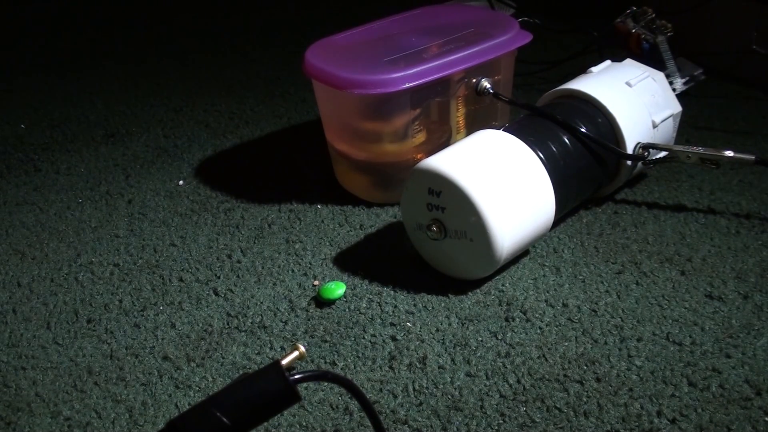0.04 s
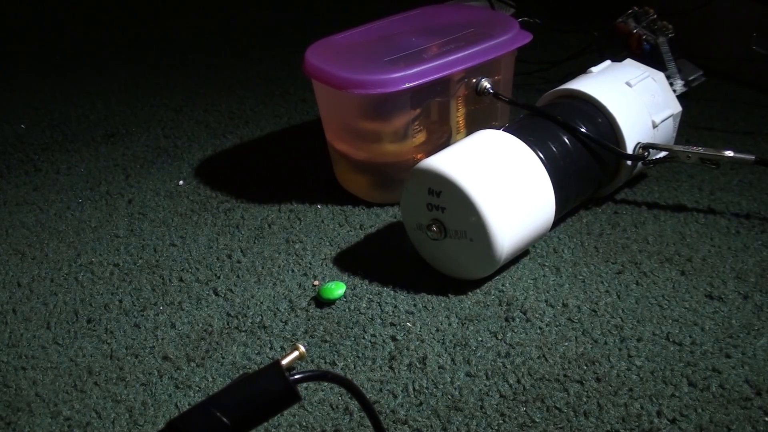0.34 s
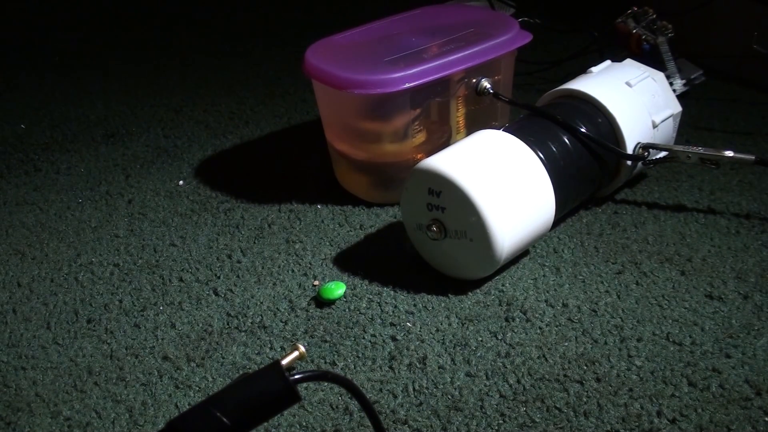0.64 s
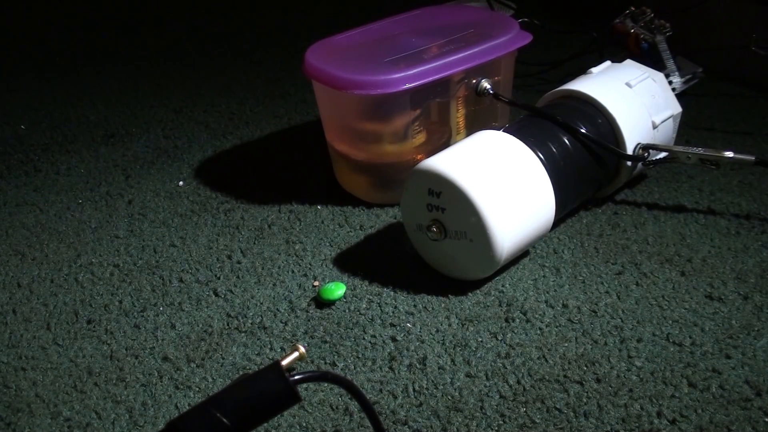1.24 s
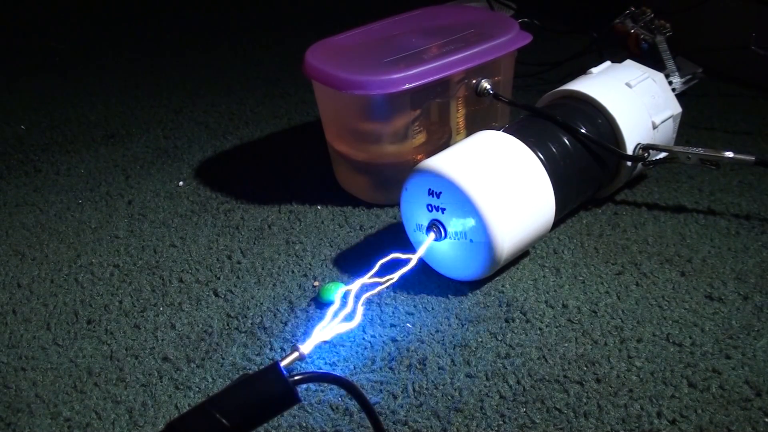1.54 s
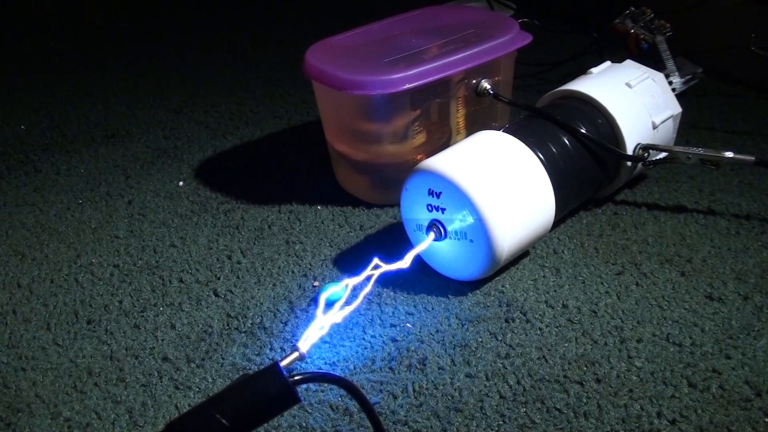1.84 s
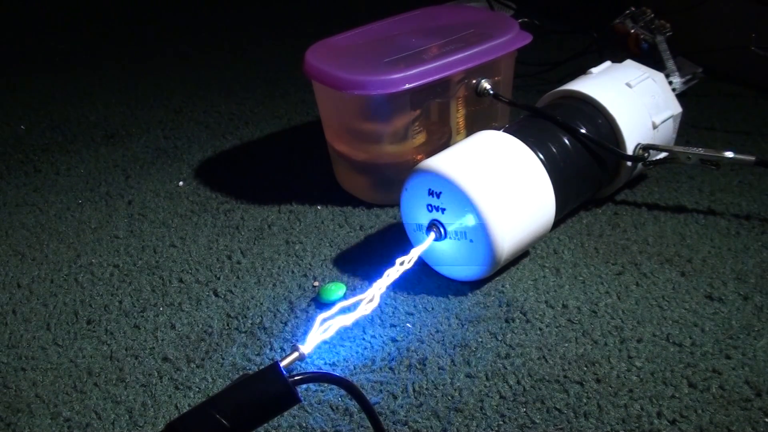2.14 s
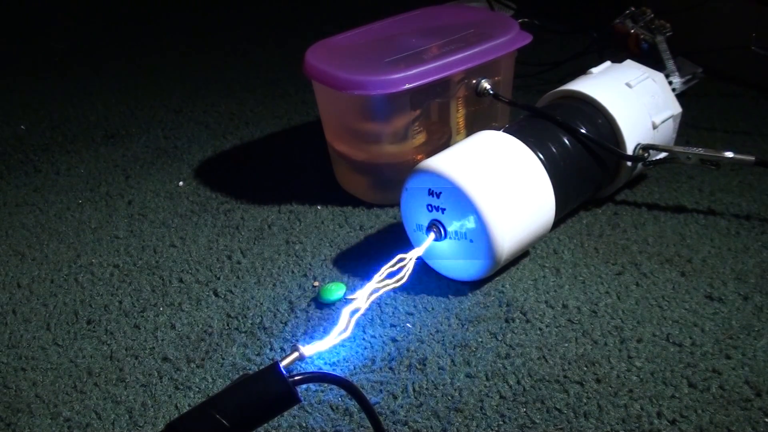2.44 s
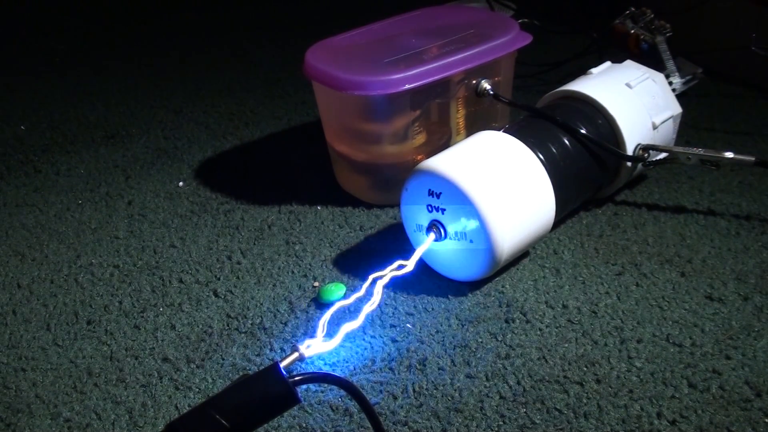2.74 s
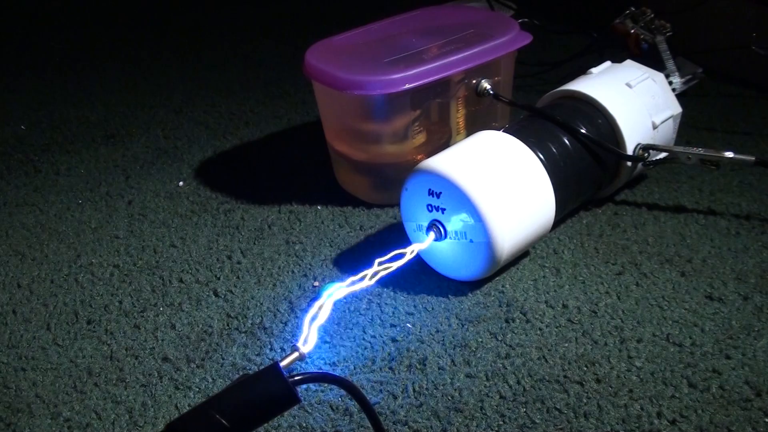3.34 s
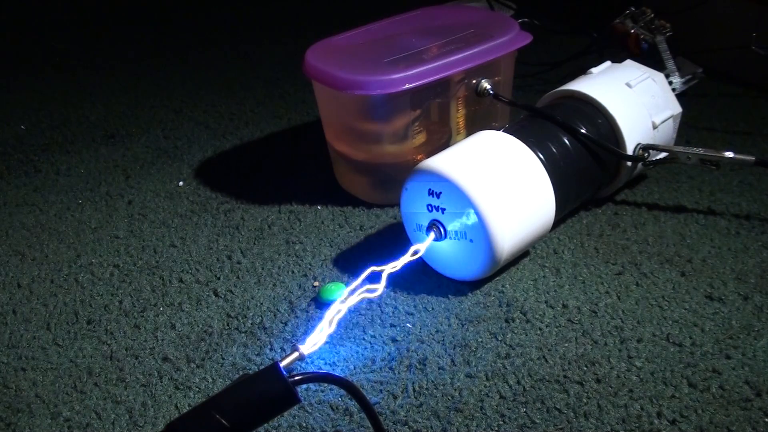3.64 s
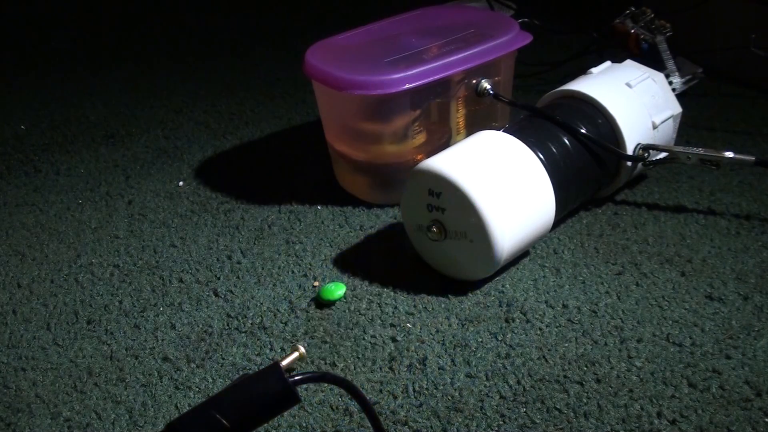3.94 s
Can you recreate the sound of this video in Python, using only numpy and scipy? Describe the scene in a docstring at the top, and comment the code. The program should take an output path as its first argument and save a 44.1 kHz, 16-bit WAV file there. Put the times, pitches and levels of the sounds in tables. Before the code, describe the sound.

A high-voltage electric arc strikes after a quiet moment, crackling and buzzing loudly.

```python
"""A small room, a stereo microphone near a high-voltage coil lying on the carpet. At first there is only
quiet air, a low hum and one tiny tick. At 1.36 s, with another tick and dull pops, an arc strikes to a
nearby probe: about 200 sparks a second at an uneven pace, each a bright snap at the electrode plus a
crack from its crooked channel. Nearby objects and the walls answer, the gain control turns down, and a
few more pops fall among the sparks. The arc stops at 3.94 s."""
import sys
import numpy as np
from scipy import signal
from scipy.fft import rfft, irfft, next_fast_len
from scipy.io import wavfile
from scipy.ndimage import uniform_filter1d, minimum_filter1d, map_coordinates

SR = 44100
rng = np.random.default_rng(int(sys.argv[2]) if len(sys.argv) > 2 else 0)


def wrap_up_sound(samples):
    """Save the sound to the file named by the first command line argument, as 16-bit audio."""
    columns = np.atleast_2d(samples).T
    # keep every value between -1 and 1, then stretch to whole-number steps
    tamed = np.clip(columns, -1, 1)
    steps = np.round(tamed * 32767).astype(np.int16)
    wavfile.write(sys.argv[1], SR, steps)


N = 176400

ARC_ON_S, ARC_OFF_S, ARC_GAIN_DB = 1.3619, 3.9365, 12.5
FULL_GAP_S, FULL_JITTER_S = .00535, .00032  # wait for a full recharge, at 0 dB drive
EARLY_GAP_S, EARLY_JITTER_S = .0041, .00042  # wait when the air breaks down early
EARLY_AFTER_FULL, EARLY_AFTER_EARLY = .36, .17  # chances of an early spark
GAP_S_PER_DB = .00009  # a stronger spark needs a longer recharge
SNAP_DB, SNAP_SCATTER_DB = -2, 0.5
FORK_DB, FORK_SPREAD_S = -8, 0.000301  # side branches at the electrode
CRACK_DB, CRACK_FACING_DB, CRACK_WANDER_DB, CRACK_DB_PER_DRIVE_DB = -11, 5, 0.37, 1.37
KINK_DB, CHANNEL_SPREAD_S = -17, 0.0002612  # bends along the channel arrive at scattered times
ALL_ROUND_DB = -12  # the crack as the room gets it, whichever way the channel faces
HARD_LIFT_DB, POP_LIFT_DB = 13, 9.5
PATH_CHANGES_PER_S, ROOM_RISE_S = 70, 0.0034
AIR_DB, HUM_WAVER_DB = -60, 1.5
THRESHOLD_DB, DEEPEST_CUT_DB, HOLD_S, TOP_HZ = -40, 14, .2, 16550  # the recorder

# strength of the arc: time_s, level_db
ARC_DRIVE = [(1.36, 3), (1.41, -1), (1.46, -1.5), (1.7, -1.9), (2.1, -0.64), (2.55, -0.57), (3.0, 0.8),
             (3.5, 1), (3.93, 1.2)]
# colour of the snap at the electrode: frequency_hz, gain_db
SNAP_COLOUR = [(60, -60), (200, -35.5), (700, -27.5), (2000, -20), (5000, -11.5), (8000, -5.5),
               (10500, -4.5), (11600, 0.7), (12500, 0.9), (13700, -1.5), (15000, -4), (16500, -9.5)]
# colour of the crack from the channel: frequency_hz, gain_db
CRACK_COLOUR = [(40, -20), (120, -9.5), (220, -9.5), (450, -4), (700, -4.5), (1300, -1), (2000, 0.5),
                (3000, 2.04), (4500, 0.96), (6500, 0), (9000, -4.5), (12000, -9), (16000, -8)]
# single cracks, mostly the hardest, before HARD_LIFT_DB: start_s, level_db
HARD_CRACKS = [(1.365, -16.5), (1.427, -13), (1.469, -16), (1.538, -18), (1.59, -19), (1.629, -17),
               (1.793, -25), (1.84, -18), (1.909, -19), (1.944, -18), (1.973, -21), (2.029, -17),
               (2.305, -16), (2.33, -18), (2.359, -18), (2.382, -15), (2.469, -18), (2.513, -17),
               (2.983, -13), (3.129, -16), (3.178, -16), (3.238, -14.5), (3.296, -17.5), (3.418, -13.5),
               (3.436, -15), (3.545, -16.5), (3.686, -33), (3.717, -19.5), (3.871, -15), (3.916, -14.5)]
# dull pops and the thumps under them, before POP_LIFT_DB: start_s, pop_db, thump_db
DULL_POPS = [(1.3617, -9.5, -13), (1.3786, 1.5, 2.5), (2.6276, -1, -16), (3.323, -8, -22),
             (3.738, -23, -28)]
# colour of a pop: frequency_hz, gain_db
POP_COLOUR = [(20, -12), (130, -6.5), (300, -2.5), (800, -2), (1400, -6.5), (2500, -27), (6000, -50)]
# colour of a thump: frequency_hz, gain_db
THUMP_COLOUR = [(20, -5), (45, -5), (70, 2.5), (130, -2.5), (300, -14), (1500, -66)]
# ticks before the arc: start_s, level_db
DRY_TICKS = [(0.7297, -27.5), (1.3587, -8)]
# reflections off the coil, the box and the walls: delay_s, level_db
NEAR_ECHOES = [(.00019, -14.5), (.00043, -17.5), (.00075, -11), (.00122, -23), (.00366, -8), (.0074, -26),
               (0.0109, -14), (0.0144, -6)]
# resonances around the coil: pitch_hz, width_hz, level_db
COIL_RESONANCES = [(716, 42, 3.5), (1260, 140, -6), (2700, 200, -13), (3490, 170, -1), (4180, 86, 4),
                   (4334, 84, -1.5), (7060, 480, -14), (8280, 120, -8), (9900, 170, -5), (13700, 200, -8)]
# time the room takes to die away by 60 dB: frequency_hz, decay_s
ROOM_DECAY = [(150, 0.26), (800, 0.36), (2000, 0.34), (5500, 0.4), (14000, 0.26)]
# colour of the room's tail: frequency_hz, gain_db
ROOM_COLOUR = [(100, -3.5), (500, 1.5), (1500, 0), (4000, -2), (9000, 2), (14000, 1.5)]
# stereo image of the tail: frequency_hz, left_right_likeness
ROOM_LIKENESS = [(100, 0.27), (500, -0.2), (1200, -0.13), (3000, 0.57), (10500, 0.62), (12000, 1)]
# colour of the quiet room air: frequency_hz, gain_db
AIR_COLOUR = [(20, -18), (45, -9), (65, -8), (80, -7), (95, -2), (115, -6), (140, -6.5), (210, -6.5),
              (290, -9), (420, -11.5), (750, -15.5), (1500, -19), (2800, -23.5), (5500, -29), (10000, -34),
              (13000, -33), (16000, -37)]
# stereo image of the air: frequency_hz, left_right_likeness
AIR_LIKENESS = [(60, 0.99), (240, 0.99), (950, 0.21), (3770, 0.058), (15000, 0.94)]
# low hum of the room: pitch_hz, level_db
HUM_TONES = [(94.4, -68.5), (138.4, -74)]


def arc(branches=4):
    """Each spark snaps at the electrode; its channel cracks loudest when broadside to the microphone."""
    times = spark_times()
    snap_scatter, facing, path = rng.standard_normal((3, len(times)))
    kink_at, kink_size, fork_at, fork_size = rng.standard_normal((4, len(times), branches))
    drive_db = np.interp(times, *np.transpose(ARC_DRIVE))
    wander = np.interp(times, np.arange(N) / SR, wobble(24))
    crack_db = CRACK_DB + CRACK_DB_PER_DRIVE_DB * drive_db
    crack_db += CRACK_FACING_DB * np.minimum(facing, 1) + CRACK_WANDER_DB * wander
    hard_s, hard_db = np.transpose(HARD_CRACKS)
    nearest = np.argmin(abs(times[:, None] - hard_s), axis=0)
    crack_db[nearest] = hard_db + HARD_LIFT_DB
    # bend the pace so that a spark lands on each hard crack
    times = times + np.interp(times, [ARC_ON_S, *times[nearest]], [0, *(hard_s - times[nearest])])
    live = times < ARC_OFF_S
    strength = live * amp(drive_db)
    snap_gain = strength * amp(SNAP_DB + SNAP_SCATTER_DB * snap_scatter)
    fork_times = times[:, None] + FORK_SPREAD_S * abs(fork_at)
    forks = pulses(fork_times, snap_gain[:, None] * amp(FORK_DB) * fork_size / 2)
    kink_times = times[:, None] + CHANNEL_SPREAD_S * kink_at
    kinks = pulses(kink_times, strength[:, None] * amp(KINK_DB) * kink_size / 2)
    snap = pulses(times, snap_gain) + forks
    crack = pulses(times + CHANNEL_SPREAD_S * path / 4, live * amp(crack_db)) + kinks
    all_round = pulses(times + CHANNEL_SPREAD_S * path, strength * amp(ALL_ROUND_DB)) + kinks
    return coloured(snap, SNAP_COLOUR), coloured(crack, CRACK_COLOUR), coloured(all_round, CRACK_COLOUR)


def spark_times(count=700):
    """The coil recharges between sparks; now and then the air gives way early."""
    chance, jitter = rng.random(count), rng.standard_normal(count)
    early = np.zeros(count, bool)
    for k in range(1, count):
        early[k] = chance[k] < (EARLY_AFTER_EARLY if early[k - 1] else EARLY_AFTER_FULL)
    gaps = np.where(early, EARLY_GAP_S + EARLY_JITTER_S * jitter, FULL_GAP_S + FULL_JITTER_S * jitter)
    gaps += GAP_S_PER_DB * np.interp(ARC_ON_S + np.cumsum(gaps), *np.transpose(ARC_DRIVE))
    return ARC_ON_S + np.cumsum(gaps) - gaps[0]


def pops():
    """A few dull pops, dry and close to the microphone, each over a deep thump."""
    start_s, pop_db, thump_db = np.transpose(DULL_POPS)
    pop = coloured(pulses(start_s, amp(pop_db + POP_LIFT_DB)), POP_COLOUR)
    thump = coloured(pulses(start_s, amp(thump_db + POP_LIFT_DB)), THUMP_COLOUR)
    return pop + thump


def ticks():
    """Tiny dry ticks before the arc strikes, as bright as its snap."""
    start_s, level_db = np.transpose(DRY_TICKS)
    return coloured(pulses(start_s, amp(level_db)), SNAP_COLOUR)


def near_echoes(x, echo_db):
    """Hard surfaces close by return sharp copies just behind the direct sound."""
    return filtered(x, lambda hz: 1 + sum(
        amp(db + echo_db) * np.exp(-2j * np.pi * hz * delay_s) for delay_s, db in NEAR_ECHOES))


def coil_resonances(x):
    """Resonances around the coil lift a few narrow bands."""
    return filtered(x, lambda hz: 1 + sum(
        amp(db) * 1j * hz * width / (pitch ** 2 - hz ** 2 + 1j * hz * width)
        for pitch, width, db in COIL_RESONANCES))


def shifting_room(x, tails=3):
    """The arc keeps changing its path, so the room's answer shifts between a few tails."""
    shares = np.array([wobble(PATH_CHANGES_PER_S) for _ in range(tails)]) ** 2
    shares /= np.linalg.norm(shares, axis=0) + 1e-9
    return sum(room_tail(x * share) for share in shares)


def room_tail(x):
    """The small room's short diffuse tail; each frequency dies at its own speed."""
    hz, t, noise = signal.stft(rng.standard_normal((2, SR // 2)), SR, nperseg=256)
    decay = amp(-60 * t / curve_at(ROOM_DECAY, hz)[:, None])
    tail = signal.istft(noise * decay, SR, nperseg=256)[1]
    tail *= 1 - np.exp(-np.arange(tail.shape[1]) / SR / ROOM_RISE_S)
    wet = signal.fftconvolve(x[None], tail / np.linalg.norm(tail[0]), axes=1)[:, :N]
    return stereo(wet, ROOM_COLOUR, ROOM_LIKENESS)


def room_tone():
    """Quiet air around the microphone, with a wavering low hum in the centre."""
    t = np.arange(N) / SR
    air = stereo(rng.standard_normal((2, N)), AIR_COLOUR, AIR_LIKENESS)
    air /= np.sqrt(np.mean(air ** 2))
    hum = np.zeros(N)
    for pitch_hz, level_db in HUM_TONES:
        peak = np.sqrt(2) * amp(level_db + HUM_WAVER_DB * wobble(8.06))
        hum += peak * np.sin(2 * np.pi * pitch_hz * t + 1.2 * wobble(4.4))
    return air * amp(AIR_DB + 0.35 * wobble(2.9)) + hum


def amp(db):
    """Decibels as an amplitude factor."""
    return 10 ** (np.asarray(db) / 20)


def curve_at(points, hz):
    """Read (frequency_hz, value) points along a log frequency axis."""
    point_hz, values = np.transpose(points)
    return np.interp(np.log(hz + 1), np.log(point_hz + 1), values)


def wobble(rate):
    """A smooth random curve, rate knots a second."""
    return map_coordinates(rng.standard_normal(int(N * rate / SR) + 4), [np.arange(N) * rate / SR])


def filtered(x, response):
    """Multiply the spectrum of x by response(hz)."""
    size = next_fast_len(N + SR // 2)
    return irfft(rfft(x, size) * response(np.fft.rfftfreq(size, 1 / SR)), size)[..., :N]


def coloured(x, colour, size=8192):
    """A minimum-phase filter: nothing sounds ahead of a click."""
    cepstrum = irfft(np.log(amp(curve_at(colour, np.fft.rfftfreq(size, 1 / SR)))))
    cepstrum[1:size // 2] *= 2
    cepstrum[size // 2 + 1:] = 0
    impulse_response = irfft(np.exp(rfft(cepstrum)))[:size // 2]
    return signal.fftconvolve(x, impulse_response)[:N]


def pulses(times, gains, half_width=8):
    """Impulses placed between the samples as windowed sincs."""
    centres = np.ravel(times)[:, None] * SR
    taps = np.floor(centres).astype(int) + np.arange(1 - half_width, half_width + 1)
    weights = np.sinc(taps - centres) * np.sinc((taps - centres) / half_width) * np.ravel(gains)[:, None]
    return np.bincount(np.clip(taps, 0, N).ravel(), weights.ravel(), N + 1)[:N]


def stereo(pair, colour, likeness):
    """Two unrelated signals, coloured and mixed as mid and side to a left-right likeness."""
    def mid_side_gains(hz):
        angle = np.arccos(np.clip(curve_at(likeness, hz), -1, 1)) / 2
        return amp(curve_at(colour, hz)) * [np.cos(angle), np.sin(angle)]
    mid, side = filtered(pair, mid_side_gains)
    return np.array([mid + side, mid - side])


def scene():
    """What reaches the microphone: the arc with its echoes and tail, pops, ticks and room tone."""
    snap, crack, all_round = arc()
    sparks = coil_resonances(near_echoes(snap, echo_db=0) + shifting_room(snap + all_round))
    sparks += near_echoes(crack, echo_db=-10)  # the crack echoes more faintly than the snap
    return amp(ARC_GAIN_DB) * (sparks + pops()) + ticks() + room_tone()


def record(dry):
    """The recorder's gain control turns down while the arc burns; nothing passes above TOP_HZ."""
    power = uniform_filter1d(np.mean(dry ** 2, axis=0), size=64)
    level = np.sqrt(abs(power)) + 1e-9
    needed_gain = np.clip(amp(THRESHOLD_DB) / level, amp(-DEEPEST_CUT_DB), 1)
    half_hold = int(HOLD_S * SR / 2)
    held_gain = minimum_filter1d(needed_gain, 2 * half_hold + 1, origin=half_hold)
    gain = uniform_filter1d(held_gain, size=32)
    return filtered(dry * gain, lambda hz: hz < TOP_HZ)


dry = scene()
out = record(dry)
wrap_up_sound(out)
```